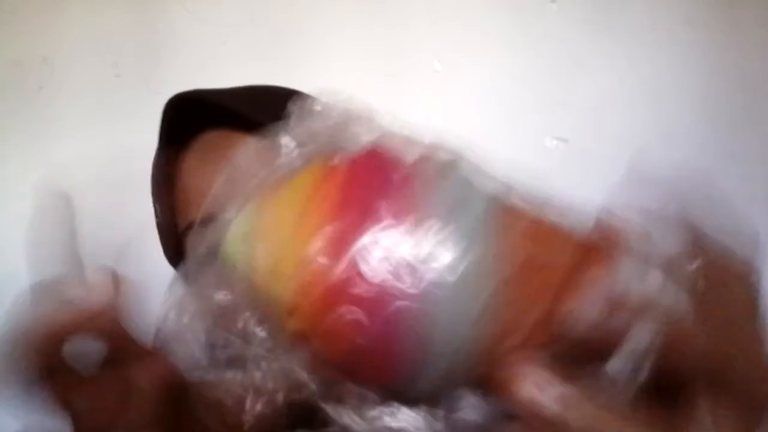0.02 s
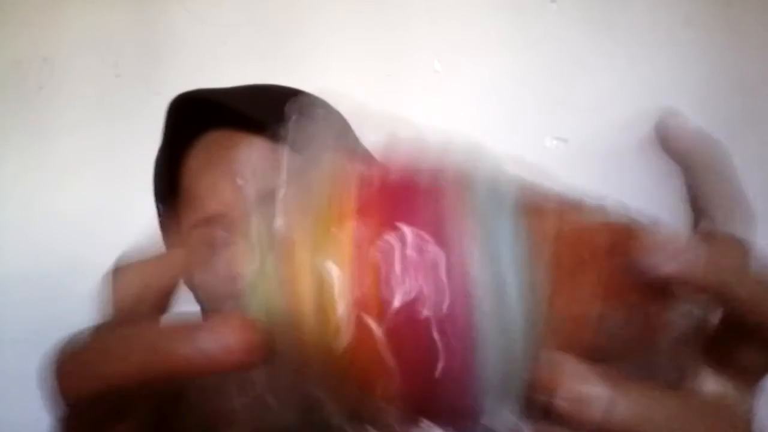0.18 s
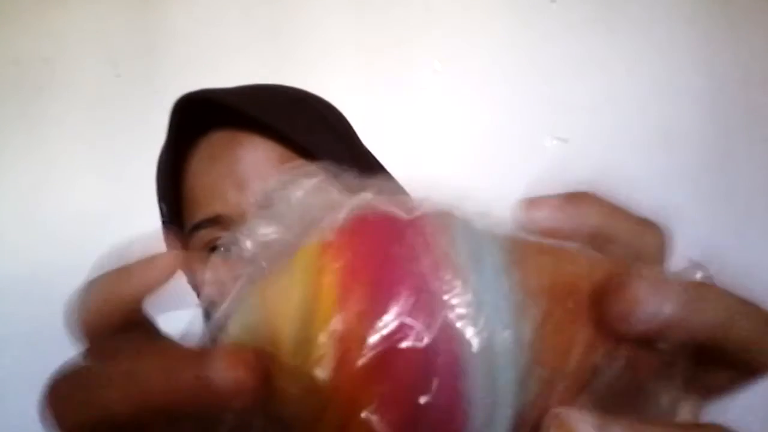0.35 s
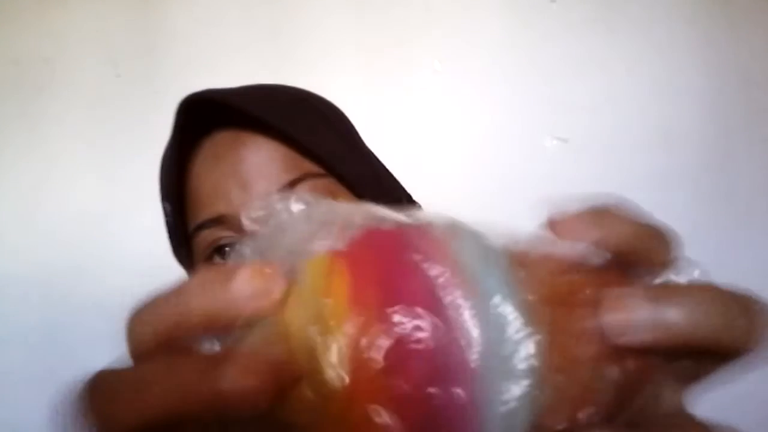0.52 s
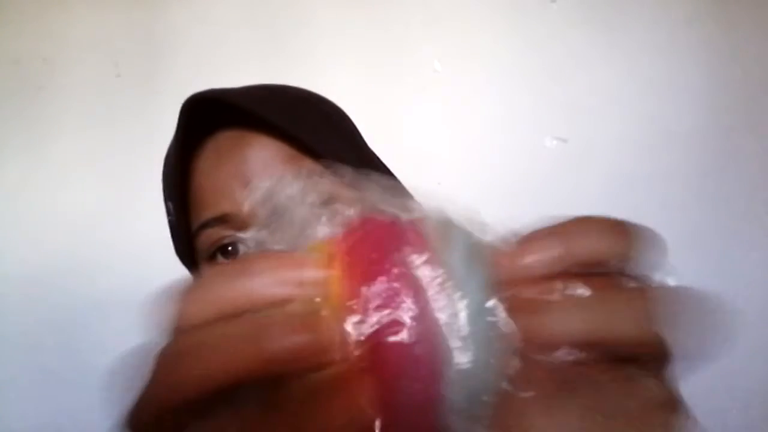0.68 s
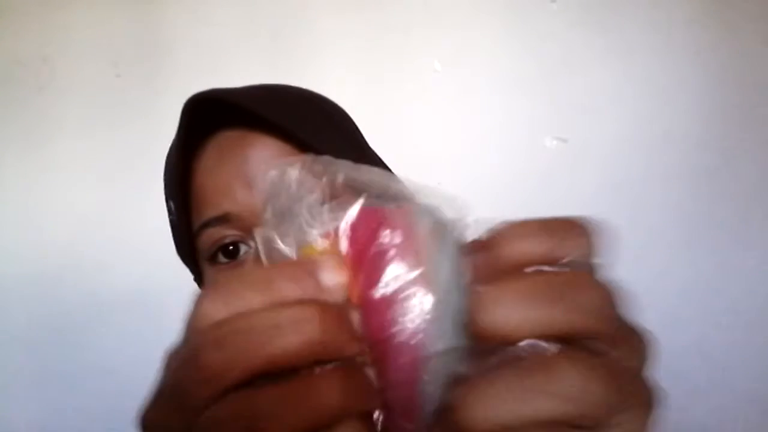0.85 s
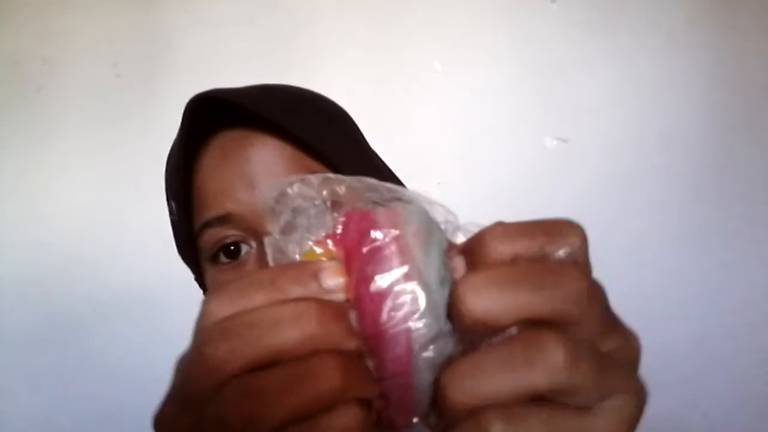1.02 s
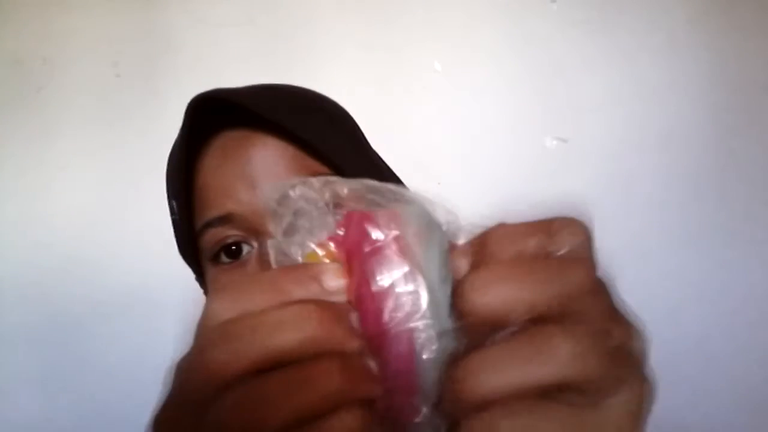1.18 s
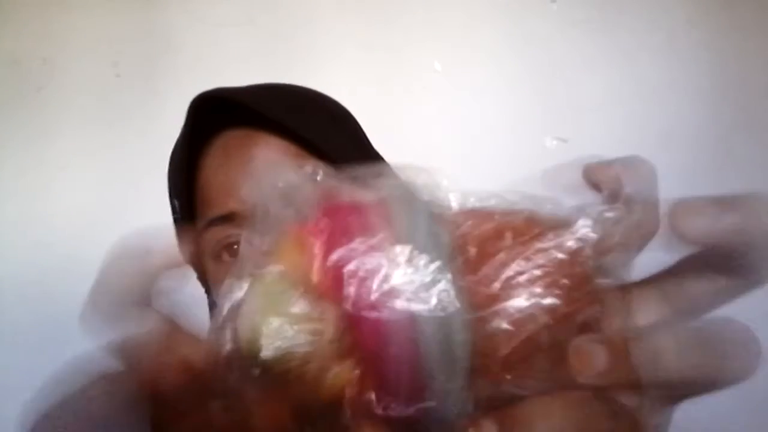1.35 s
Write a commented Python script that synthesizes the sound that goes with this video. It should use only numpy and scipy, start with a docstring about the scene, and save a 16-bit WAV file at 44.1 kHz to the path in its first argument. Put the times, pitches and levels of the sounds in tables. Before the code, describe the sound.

A thin plastic bag crinkles close by as hands turn a soft toy inside it, with short crackly bursts around 0.2 and 0.45 seconds. From about 0.7 to 0.95 seconds a hard squeeze brings a louder, denser crumple full of sharp snaps. It then thins to light ticks, fading by about 1.3 seconds. Faint, dull finger bumps and a low room hum lie underneath.

```python
"""Soft toy in a plastic bag

A soft toy in a thin plastic bag is turned over, then squeezed hard, near a small microphone in a
quiet room. The film buckles in a crowd of tiny clicks, with sharp snaps standing out as single creases
flip; the squeeze adds a lower crumple of whole folds. Fingers bump the toy softly,
and the room hums faintly and answers briefly."""
import sys
import numpy as np
from scipy import signal
from scipy.fft import rfft, irfft, next_fast_len
from scipy.io import wavfile
from scipy.ndimage import uniform_filter1d, map_coordinates

SR = 44100
rng = np.random.default_rng(int(sys.argv[2]) if len(sys.argv) > 2 else 0)


def store_pcm(level_fs):
    """Save levels as 16-bit WAV."""
    pcm = np.round(np.clip(level_fs, -1, 1) * 32767).astype(np.int16)
    wavfile.write(sys.argv[1], SR, np.atleast_2d(pcm).T)


N = 59535
TOP_HZ = 15480  # highest click pitch, and the low-pass cutoff


def amp(db):
    """Decibels to gain."""
    return 10 ** (np.asarray(db) / 20)


def unit(x):
    """Scale to rms 1."""
    return x / np.sqrt(np.mean(x ** 2) + 1e-20)


def along(points, hz):
    """Read (f/Hz, value) points on a log frequency axis."""
    f, v = np.transpose(points)
    return np.interp(np.log(hz + 1), np.log(f + 1), v)


def coloured(x, spectrum, size=2048):
    """Minimum-phase EQ through (f/Hz, level/dB) points."""
    gain = amp(along(spectrum, np.fft.rfftfreq(size, 1 / SR)))
    cepstrum = irfft(np.log(gain))
    cepstrum[1:size // 2] *= 2
    cepstrum[size // 2 + 1:] = 0
    return signal.fftconvolve(x, irfft(np.exp(rfft(cepstrum))))[:len(x)]


def steady(x, size=700):
    """Hold the short-term rms of x at 1, keeping its spikes."""
    power = uniform_filter1d(uniform_filter1d(x ** 2, size), size)
    return x / np.sqrt(np.abs(power) + 1e-4 * np.mean(x ** 2))


def wobble(rate):
    """A smooth random curve, rate knots a second."""
    return map_coordinates(rng.standard_normal(1000), [np.arange(N) * rate / SR], mode="wrap")


def room_tone():
    """A faint noise bed: low hum under a thin hiss."""
    # air spectrum: f/Hz, level/dB
    air_eq = [(25, -25), (60, -9), (100, -4), (135, 2), (200, 0.5), (350, -13.5), (1200, -14.5),
              (3000, -14.5), (5400, -14), (8300, -26.5), (15500, -30)]
    return amp(-71) * unit(coloured(rng.standard_normal(N), air_eq))


def room_answer(x, count=12, early_s=.014):
    """Early reflections off hands and wall, and a short tail that dies faster in the treble."""
    # time the tail takes to fall 60 dB: f/Hz, t/s
    decay = [(200, .25), (2000, 0.19), (6000, 0.11), (15000, 0.17)]
    hz, t, noise = signal.stft(rng.standard_normal(SR // 2), SR, nperseg=256)
    tail = signal.istft(noise * amp(-60 * t / along(decay, hz)[:, None]), SR, nperseg=256)[1]
    answer = amp(-20) * np.pad(tail / np.linalg.norm(tail), (SR // 200, 0))  # 5 ms pre-delay
    for delay, polarity in rng.random((count, 2)):
        answer[int((delay + .1) * early_s * SR)] += amp(-14.5) * np.sign(polarity - .5) / np.sqrt(count)
    return signal.fftconvolve(x, answer)[:N]


def fingers():
    """Dull, soft bumps of the fingers on the padded toy."""
    # bell-shaped bumps: t/s, level/dB, width/s
    bumps = [(0.028, -69.5, 0.025), (0.177, -75.5, 0.031), (.292, -63.5, 0.025), (.46, -70, 0.027),
             (0.711, -70.5, 0.012), (0.834, -76, 0.03), (1.008, -67.5, 0.013), (1.33, -66.5, 0.012)]
    thud_eq = [(50, -31), (120, -1), (190, -4), (320, -10.5), (900, -44)]  # f/Hz, level/dB
    t = np.arange(N) / SR
    press = sum(amp(db) * np.exp(-.5 * ((t - s) / width) ** 2) for s, db, width in bumps)
    return press * steady(coloured(rng.standard_normal(N), thud_eq))


def ping(t, hz, rise_s):
    """A facet of film rings for a few cycles under an envelope that peaks at 1."""
    u = np.maximum(t, 0) / rise_s
    return (u * np.e / 2) ** 2 * np.exp(-u) * np.sin(2 * np.pi * hz * t)


def clicks(per_s, eq, centre_hz, spread, cycles, scatter_db, size=200):
    """Random buckling clicks at a changing rate, each with its own pitch; EQ'd and levelled."""
    total = np.cumsum(per_s) / SR
    place, pitch, strength = rng.random((int(total[-1]), 3)).T
    start = np.searchsorted(total, (np.arange(len(place)) + 6 * place) % total[-1])
    hz = np.minimum(centre_hz * np.exp(spread * (2 * pitch - 1)), TOP_HZ)[:, None]
    gain = amp(scatter_db * np.minimum(-np.log(1 - strength), 3.5))[:, None]
    grains = gain * ping(np.arange(size) / SR, hz, cycles / hz)
    train = np.bincount((start[:, None] + np.arange(size)).ravel(), grains.ravel(), N + size)[:N]
    return steady(coloured(train, eq))


def crinkle(reference_db=-45):
    """Film worked harder clicks louder, denser and fizzier over a sliding rustle; folds crumple below."""
    # how hard the film is worked: t/s, fine crinkle/dB, mid crumple/dB, low crumple/dB
    crush = [(0, -54, -59.5, -75), (0.02, -53.5, -60.5, -78), (0.045, -49, -55.5, -69),
             (0.068, -59, -66, -72), (0.12, -56, -66.5, -78), (0.18, -51, -67.5, -78.5),
             (0.204, -46, -60, -65.5), (0.215, -41, -55, -58.5), (0.232, -53, -65, -77),
             (0.255, -47, -54.5, -58.5), (0.29, -49, -58, -69), (0.325, -54, -64, -70),
             (0.352, -65, -68, -78), (0.385, -62, -68.5, -80), (0.41, -53, -60.5, -79),
             (0.435, -48, -61.5, -71), (0.455, -44, -49.5, -62), (0.475, -51, -66, -76),
             (0.505, -55, -65, -76), (0.55, -54, -61, -72), (0.6, -49, -58, -72),
             (0.665, -45, -54.5, -64.5), (0.71, -40, -49, -55.5), (0.75, -41, -52, -62),
             (0.785, -38, -46, -51.5), (0.822, -36, -45.5, -49), (0.885, -37, -45.5, -55.5),
             (0.919, -42, -53.5, -67), (0.96, -47, -62.5, -67), (1.0, -45.5, -58.5, -73),
             (1.05, -50.5, -57, -69), (1.11, -52.5, -65, -65), (1.165, -53, -63, -83),
             (1.19, -63.5, -75.5, -74), (1.22, -64, -75, -76), (1.25, -58.5, -79, -73),
             (1.289, -68, -78, -82), (1.35, -67.5, -79.5, -82)]
    # spectra of the fine clicks and fizz, with a bright microphone resonance near 5.5 kHz: f/Hz, level/dB
    fine_mic_eq = [(300, -55.5), (1000, -19.5), (2000, -4), (3500, -9), (4500, -1.5), (5500, 2.5),
                   (6500, -5), (8200, -14), (11000, -23.5), (15500, -25.5)]
    fizz_mic_eq = [(500, -18), (2500, 3), (5500, 9), (8300, 0), (10500, -1), (13000, 0.5), (15500, -2)]
    # spectra of the mid and low crumple: f/Hz, level/dB
    fold_eq = [(100, -44), (400, -20.5), (800, -8.5), (1300, -4), (1900, 2), (2800, 1.5), (5000, -18),
               (9000, -42)]
    deep_eq = [(40, -47), (150, -18), (270, -6.5), (450, -3), (750, 4), (1200, -2.5), (3000, -30)]
    times, *levels = np.transpose(crush)
    fine_db, mid_db, low_db = (np.interp(np.arange(N) / SR, times, db) for db in levels)
    effort_db = fine_db - reference_db
    avalanches = amp(1.5 * wobble(120))  # the film gives way in small clumps
    density = amp(.45 * effort_db)
    ticks = clicks(3000 * density, fine_mic_eq, centre_hz=4880, spread=.46, cycles=.59, scatter_db=5)
    fizz = clicks(1200 * density, fizz_mic_eq, centre_hz=10640, spread=.39, cycles=.32, scatter_db=3.5)
    folds = clicks(1900 * density, fold_eq, centre_hz=1700, spread=.71, cycles=.52, scatter_db=4.5)
    deep = clicks(1900 * density, deep_eq, centre_hz=567, spread=.68, cycles=.31, scatter_db=4, size=400)
    rustle = unit(coloured(rng.standard_normal(N), fine_mic_eq))
    fine = amp(fine_db) * (amp(-1.5) * ticks + amp(-9) * rustle)
    fine += amp(reference_db - 18.5 + 1.37 * effort_db) * fizz  # swells faster than the ticks
    return avalanches * (fine + amp(mid_db - 2) * folds + amp(low_db - 2.5) * deep)


def snaps(size=1024, count=3, settle_s=.0027, crack_decay_s=.00022):
    """Each crease flips with a short ring and a broad crack, then settles in fading, detuned clicks."""
    # creases snapping through: t/s, level/dB, ring f/Hz, crack trim/dB, settling trim/dB
    creases = [(0.0346, -35.5, 4700, -15.5, -6), (0.0412, -33, 5540, -17, -16),
               (0.0478, -34.5, 4610, -17.5, -21), (0.0942, -38.5, 4300, -13, -5),
               (0.115, -41, 5100, -15.5, -14), (0.1573, -31.5, 4950, -14, -20),
               (0.2101, -26.5, 3950, -10, -4.5), (0.2128, -24.5, 4470, -16, -9),
               (0.2175, -24.5, 5300, -13, -30), (0.2316, -38, 4750, 2, -22),
               (0.2513, -31.5, 4530, -8.5, -1.5), (0.2552, -28.5, 4700, -15, -4),
               (0.261, -29.5, 6040, -20, -26), (0.2843, -30.5, 4730, -6, -9), (0.2945, -36, 3800, 3, -19),
               (0.3783, -45, 4800, -5, -4), (0.4037, -33, 5150, -12.5, -11), (0.454, -25, 4800, -20, -18),
               (0.4873, -41, 5040, -20, -18), (0.5135, -33, 5470, -27, -27), (0.5332, -29, 5780, -35, -22),
               (0.5761, -34.5, 5100, -21, -24), (0.5848, -33, 5280, -11, -28),
               (0.6824, -26.5, 4240, -4, -6), (0.7011, -21.5, 5200, -24.5, -12),
               (0.709, -28.5, 4100, 3, -11), (0.7126, -20, 5347, -8, -4.5), (0.729, -23, 5083, -29, -1),
               (0.7395, -20.5, 5560, -15, -14.5), (0.7563, -28, 5610, 1, -11),
               (0.7693, -20.5, 4270, -7.5, -6.5), (0.819, -21.5, 5100, -5, -9),
               (0.8251, -18.5, 5430, -9, -7), (0.8447, -15.5, 5380, -20.5, -10),
               (0.8509, -21.5, 5102, -22, -18), (0.8529, -27.5, 4940, -3, -22), (0.859, -25, 5706, -8, -17),
               (0.8681, -25.5, 4691, 5, -20), (0.8766, -21, 3600, -12, -6), (0.8816, -21.5, 5170, -14, -9),
               (0.898, -23, 4810, 7, -13), (0.9133, -26, 4800, 2, -27), (0.9209, -20.5, 4220, -8.5, -15),
               (0.9374, -24.5, 5400, -14, -17), (0.9806, -16, 6020, -20.5, -29),
               (0.9902, -32, 4762, -8, -10), (1.0131, -37, 4808, -14, -20), (1.0276, -25, 4790, -18, -18),
               (1.0416, -27, 4770, -13, -7), (1.0436, -34, 4710, -26, -20), (1.0712, -33, 4640, -21, -5),
               (1.0745, -31.5, 5160, -30, -11), (1.0878, -30, 5100, -26, -17), (1.109, -35, 5340, -33, -22),
               (1.123, -36, 5186, -19, -20), (1.1601, -36.5, 4705, -22, -4), (1.1715, -40, 4485, -25, -5),
               (1.2004, -45, 5100, -13, -16), (1.2283, -39.5, 4593, -11.5, -17),
               (1.245, -37.5, 5340, -15.5, -4.5), (1.2796, -47, 5840, -8, -17),
               (1.2834, -41.5, 5593, -12, -21), (1.33, -46.5, 5250, -11, -15.5)]
    # crack spectrum: f/Hz, level/dB
    crack_eq = [(50, -62), (150, -40), (300, -19), (600, -10), (1500, -6), (3000, 1), (5500, 2.5),
                (8200, -10), (12000, -12), (15500, -15)]
    out, t = np.zeros(N + 2 * size), np.arange(size) / SR
    for s, db, hz, crack_db, settle_db in creases:
        flips = [(s, db, hz)]
        for k, (delay, detune) in enumerate(rng.random((count, 2))):
            lag_s = settle_s * (k + .7 + .6 * delay) / count
            flips.append((s + lag_s, db + settle_db + 1 - 2.3 * k, hz * (.73 + .48 * detune)))
        for start, level_db, pitch in flips:
            ring = ping(t, pitch, rise_s=.00012)
            crack = coloured(rng.standard_normal(size) * t * np.exp(-t / crack_decay_s), crack_eq)
            flip = unit(unit(ring) + amp(crack_db + 4) * unit(crack)) * ring.std()
            out[round(start * SR):][:size] += amp(level_db - 1.3) * flip
    return out[:N]


def scene():
    """The bag and the fingers in the quiet room, in mono."""
    bag = crinkle() + snaps()
    air = room_tone()
    return (bag + room_answer(bag) + fingers() + air)[None]


def record(dry):
    """A brick-wall low-pass takes off the very top."""
    size = next_fast_len(N + SR // 2)
    hz = np.fft.rfftfreq(size, 1 / SR)
    return irfft(rfft(dry, size) / (1 + (hz / TOP_HZ) ** 200), size)[..., :N]


dry = scene()
out = record(dry)
store_pcm(out)
```